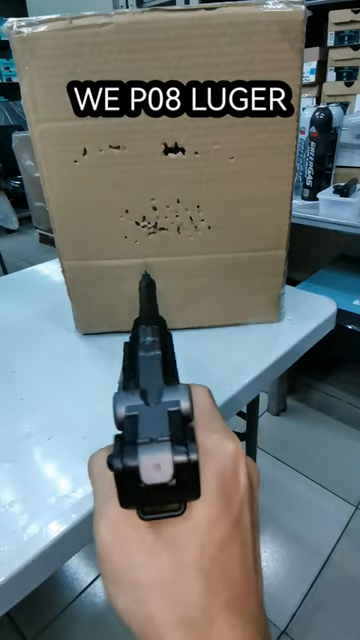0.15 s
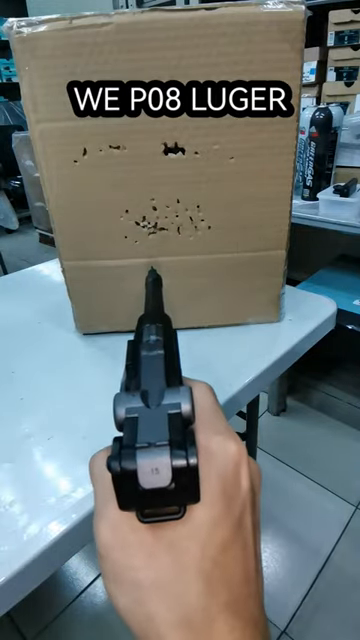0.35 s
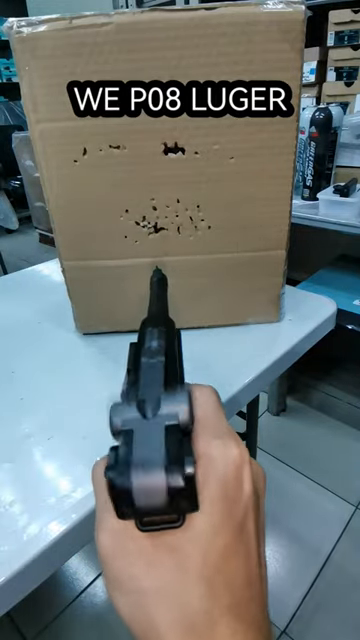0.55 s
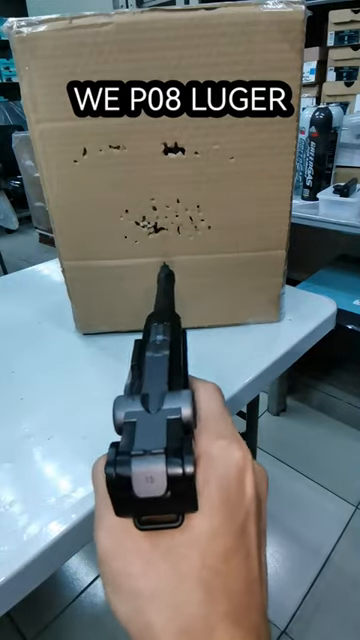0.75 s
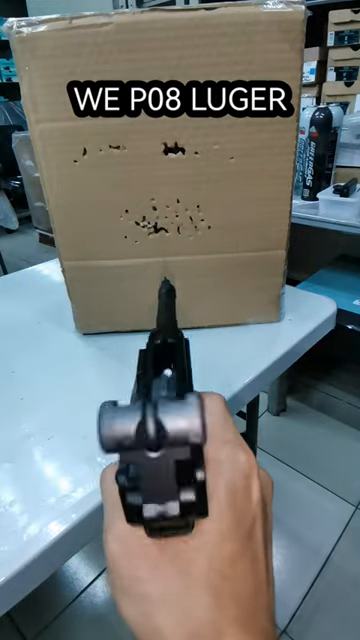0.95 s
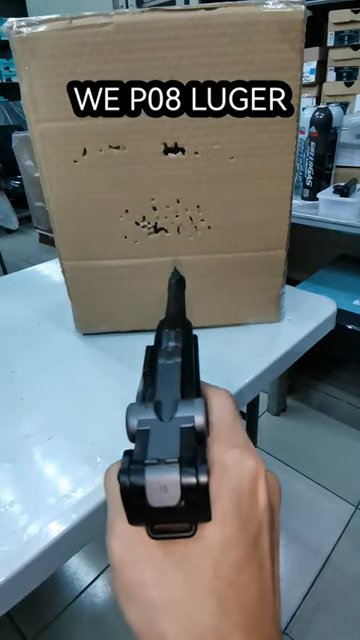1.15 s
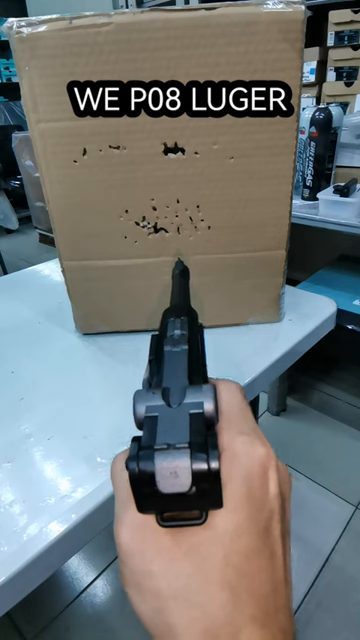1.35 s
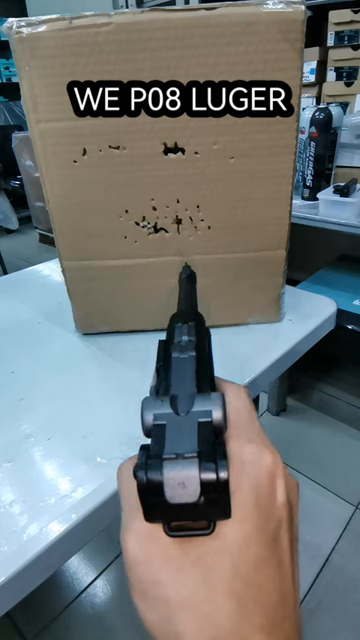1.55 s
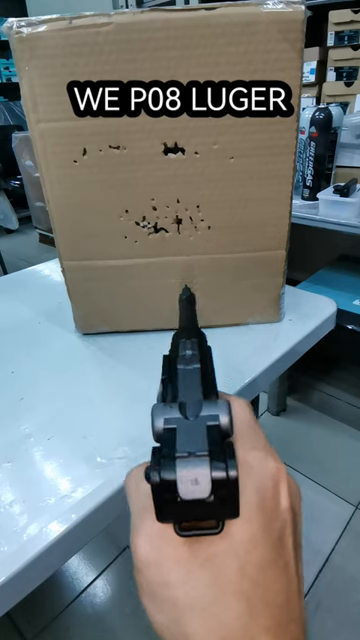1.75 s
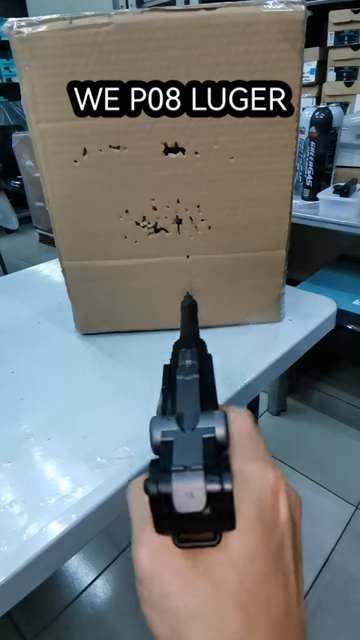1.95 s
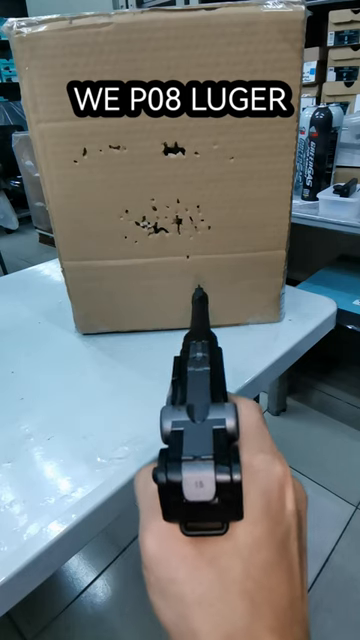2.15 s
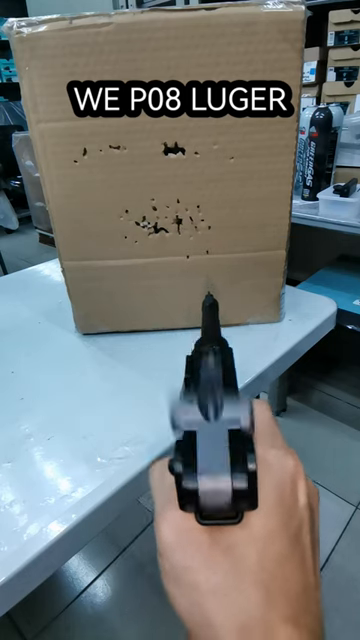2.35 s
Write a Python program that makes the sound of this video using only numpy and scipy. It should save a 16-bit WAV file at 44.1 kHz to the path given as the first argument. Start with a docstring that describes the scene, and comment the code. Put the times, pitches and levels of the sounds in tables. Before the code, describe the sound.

Five sharp gas airsoft pistol shots, close in stereo, at about 0.2, 0.65, 1.1, 1.5 and 2.0 seconds, the first loudest. Each has a dry crack and low gas puff, a hollow cardboard smack 20 milliseconds later, and a metallic clack as the action shuts. Tiny trigger ticks precede the last four; pellets bounce near 0.37, 0.8 and faintly 1.8. Short bright room tail, faint ventilation.

```python
"""Five sharp pistol shots smack a cardboard box close by, each with a short room ring, over faint ventilation.
A gas blowback airsoft pistol is fired in a small shop, just in front of the microphone pair.
Each shot is shaped noise for the crack and venting gas, with decaying tones for the steel and the box.
The toggle then hits its rear stop and snaps shut; three times a spent pellet bounces.
Light trigger ticks come before every shot but the first. Filtered noise makes the air and the room."""
import sys
import numpy as np
from scipy import signal
from scipy.fft import rfft, irfft
from scipy.io import wavfile

SR = 44100
rng = np.random.default_rng(int(sys.argv[2]) if len(sys.argv) > 2 else 0)


def wav_out(sig):
    """Save sig, one row per channel (or a flat mono array), as 16-bit PCM at SR to the path in sys.argv[1]."""
    wavfile.write(sys.argv[1], SR, np.round(np.clip(np.atleast_2d(sig).T, -1, 1) * 32767).astype(np.int16))


N = 103635  # length in samples

# hammer and gas burst of each shot: t/s, relative level/dB, bass/dB, middle/dB, steel band/dB, treble/dB,
# rise/s, decay/s, left over right/dB, pitch ratio
SHOT_EVENTS = [(.2030, 2.5, -3, -1.5, 0, -2, 0.0054, 0.0035, 0, .94),
               (0.6535, -4, 0.5, 0.5, -1.5, -1, 0.0038, 0.011, -2, 1.017),
               (1.082, -3, -2.5, 3, 1.5, 1.5, 0.0054, 0.0058, -1.5, 0.97),
               (1.5240, -0.25, -5.5, 0.5, 1, 0, 0.0041, 0.0066, -0.5, 0.98),
               (2.0202, -1, -3, 3, 2.5, 0, 0.0041, 0.0041, -1.5, 1.007)]
# spectrum of the toggle's metal blows: f/Hz, relative level per Hz/dB
METAL_SPECTRUM = [(25, 0.5), (70, -3.5), (250, -7.5), (500, -16), (900, -4), (1500, 0), (2300, -1.5),
                  (3200, 3), (4700, -2.5), (6000, -4), (7500, -2), (9500, -6), (13000, -8), (16000, -22.5)]


def amp(db):
    """Turns decibels into a gain."""
    return 10 ** (np.asarray(db) / 20)


def read(points, hz):
    """Reads a curve between its points, on a log-frequency axis."""
    f, value = np.transpose(points)
    return np.interp(np.log(hz + 1), np.log(f + 1), value)


def add(mix, s, sound):
    """Lays a sound into the mix at time s, cutting off what runs past the end."""
    part = mix[:, max(round(s * SR), 0):][:, :sound.shape[-1]]
    part += sound[..., :part.shape[1]]


def pair(z):
    """Blends two unrelated signals until they are as alike as the two microphones hear them."""
    # likeness of the microphones, limited to +-0.99 below: f/Hz, correlation
    likeness = [(60, -0.4), (160, 1.1), (300, 0.78), (700, 0.38), (1300, -0.1), (2200, -0.04),
                (4500, -0.14), (12000, 0)]
    a, b = rfft(z)
    same = np.clip(read(likeness, np.fft.rfftfreq(z.shape[1], 1 / SR)), -.99, .99)
    mid = a * np.sqrt((1 + same) / 2)
    side = b * np.sqrt((1 - same) / 2)
    return irfft(np.array([mid + side, mid - side]), z.shape[1])


def colour(x, points, tone=(0, 0, 0, 0), size=4096):
    """Filters with a spectrum scaled to unit power, then four broad tone controls; nothing sounds early."""
    # centres of the bass, middle, steel band and treble controls: f/Hz
    tone_centres = [200, 1500, 4800, 10000]
    hz = abs(np.fft.fftfreq(size, 1 / SR))
    gain = amp(read(points, hz))
    gain = gain / np.sqrt(np.mean(gain ** 2))
    gain = gain * amp(read(list(zip(tone_centres, tone)), hz))
    # minimum phase: the filter's energy comes as early as it can
    log_spectrum = np.conj(signal.hilbert(np.log(gain)))
    taps = np.fft.ifft(np.exp(log_spectrum)).real
    return signal.fftconvolve(x, taps[None, :size // 2], axes=1)[:, :x.shape[1]]


def clock(size=16384):
    """Time axis of one event, in seconds."""
    return np.arange(size) / SR


def swell(rise_s, decay_s):
    """Loudness shape of a blow: an accelerating rise, then an exponential fall."""
    t = clock()
    rise = np.minimum(t / rise_s, 1) ** 2
    fall = np.exp(-np.maximum(t - rise_s, 0) / decay_s)
    return rise * fall


def burst(envelope):
    """A dense rattle of tiny positive or negative pressure steps under an envelope."""
    return pair(rng.choice([-1., 1.], (2, len(envelope)))) * envelope


def ventilation():
    """Air noise and a faint wavering hum; both sink at each shot and creep back."""
    # spectrum of the air noise: f/Hz, relative level per Hz/dB
    air_spectrum = [(25, -14), (70, -7.5), (145, -12.5), (220, -7), (640, -9.5), (950, -9), (1400, -9),
                    (2600, -10.5), (4800, -17), (6500, -26), (12000, -41), (16000, -44)]
    # air noise over time: t/s, level/dB
    air_level = [(0, -53.5), (.19, -52.5), (.26, -74), (.48, -62.5), (.63, -57.5), (.75, -68.5),
                 (1.03, -59), (1.2, -63.5), (1.47, -59.5), (1.62, -67.5), (1.97, -57), (2.1, -61),
                 (2.35, -63.5)]
    # hum tones at their fullest: f/Hz, level/dB
    hum_tones = [(145.3, -71.5), (506, -76), (651, -75), (1394, -71.5)]
    hum_full_db = -57.5  # air level below which the hum sinks with it
    t = np.arange(N) / SR
    level_db = np.interp(t, *np.transpose(air_level))
    hum = 0
    for hz, db in hum_tones:
        waver = .02 * np.cumsum(rng.standard_normal(N))
        phase = 2 * np.pi * hz * t + waver + rng.random((2, 1))
        hum = hum + amp(db) * np.sqrt(2) * np.sin(phase)
    air = colour(pair(rng.standard_normal((2, N))), air_spectrum)
    return air * amp(level_db) + hum * amp(np.minimum(level_db - hum_full_db, 0))


def steel(rise_s):
    """The ring of the barrel and toggle: fading tones, whose balance differs at every blow."""
    # ringing tones of the steel parts: f/Hz, relative level/dB, time to fall 60 dB/s
    steel_modes = [(2153, 9, 0.15), (2860, -7, 0.082), (3434, -8.5, .2), (4322, 2, .15), (4400, -4, .2),
                   (4645, -3, .18), (4740, -8, 0.17), (5300, 3, 0.13), (4960, -30, .12), (5600, -8, .1),
                   (7000, -12, .12)]
    t = clock()
    ring = 0
    for hz, db, t60 in steel_modes:
        strength = rng.rayleigh(np.sqrt(.5))
        tone = np.sin(2 * np.pi * (hz * t + rng.random((2, 1))))
        ring = ring + strength * amp(db - 60 * t / t60) * tone
    return amp(-32) * np.minimum(t / rise_s, 1) ** 2 * ring


def shots():
    """The hammer knocks the valve open: a crack, then venting gas."""
    # spectrum of crack and gas at pitch ratio 1: f/Hz, relative level per Hz/dB
    shot_spectrum = [(25, -20), (60, -24), (140, -2), (260, 1.5), (400, -2.5), (620, 0), (820, 5.5),
                     (1000, 2), (1500, -1), (2400, 0), (3700, -1.5), (4400, 4.5), (5200, 9.5), (5900, -1.5),
                     (7500, -4), (10500, -8.5), (13500, -9.5), (16000, -24.5)]
    shot_db = -13  # added to every shot's own level
    vent_db, vent_s = -15, 0.032  # gas level relative to the crack, and its decay time
    out = np.zeros((2, N))
    for s, db, bass, middle, band, treble, rise_s, decay_s, pan_db, pitch in SHOT_EVENTS:
        envelope = swell(rise_s, decay_s) + amp(vent_db) * swell(rise_s, vent_s)
        spectrum = [(hz * pitch, level) for hz, level in shot_spectrum]
        crack = colour(burst(envelope), spectrum, (bass, middle, band, treble))
        crack = crack + amp(band) * steel(rise_s)
        left_right = amp([[pan_db / 2], [-pan_db / 2]])
        add(out, s, amp(shot_db + db) * left_right * crack)
    return out


def room(x):
    """Early echoes from the table and shelves, then the shop's tail, which fades at its own rate per pitch."""
    # how fast the tail fades: f/Hz, time to fall 60 dB/s
    fade_times = [(150, .5), (400, 0.34), (1000, 0.37), (2800, 0.4762), (5000, 0.53), (9000, 0.4677),
                  (15000, 0.43)]
    # spectrum of the tail, which also sets its strength: f/Hz, level/dB
    tail_spectrum = [(40, -28), (110, -34), (170, -24), (275, -17), (400, -20), (900, -16.5), (2500, -12),
                     (5000, -14.5), (8500, -13), (9500, -9.5), (10800, -11.5), (15000, -13.5)]
    # spectrum of the early echoes: f/Hz, relative level/dB
    early_spectrum = [(40, -45), (150, -16.5), (300, 0.5), (600, -7), (1500, 0), (5000, 0), (16000, 3)]
    onset_s, early_db, early_s = 0.029, -5, 0.016  # tail rise, early echo level and decay
    t = np.arange(SR) / SR
    # scattered echoes: about one sample in 25, none in the first 3 ms
    sparse = rng.choice([-1., 1.], (2, SR)) * (rng.random((2, SR)) < .04)
    early = pair(sparse) * np.exp(-t / early_s) * (t > .003)
    early_size = np.sqrt(np.sum(early ** 2) / 2)
    early = amp(early_db) * colour(early, early_spectrum) / early_size
    hz, times, z = signal.stft(pair(rng.standard_normal((2, SR))), SR, nperseg=256)
    fade = amp(-60 * times / read(fade_times, hz)[:, None])
    tail = signal.istft(z * fade, SR, nperseg=256)[1][:, :SR]
    tail = tail * np.minimum(t / onset_s, 1) ** 2
    tail_gain = np.sqrt(np.mean(amp(read(tail_spectrum, hz)) ** 2))
    tail = tail_gain * colour(tail / np.linalg.norm(tail[0]), tail_spectrum)
    return signal.fftconvolve(x, tail + early, axes=1)[:, :N]


def puffs():
    """Each shot blows one low push and pull of pressure across the microphones."""
    # gas puffs: t of the middle/s, peak level on the left/dB, f/Hz, right as a share of left (minus = flipped)
    puff_events = [(0.2135, -16.5, 140, -0.098), (0.661, -25, 170, -0.7), (1.088, -26, 200, -0.87),
                   (1.531, -18, 170, 0.24), (2.0250, -23, 240, -0.54)]
    out, t = np.zeros((2, N)), np.arange(N) / SR
    for s, db, hz, right in puff_events:
        u = 2 * np.pi * hz * (t - s)
        push_pull = -u * np.exp((1 - u ** 2) / 2)
        out += np.array([[1], [right]]) * amp(db) * push_pull
    return out


def box():
    """The pellet punches the cardboard: a snap and a hollow knock, its tones shifted slightly at random each time."""
    # pellet hits: t/s, relative level/dB, extra snap/dB
    hits = [(0.2222, 1, -0.5), (0.6713, 1.5, 1.5), (1.1010, 0.5, -6), (1.543, 1.5, 0), (2.0384, -1.5, -2.5)]
    # hollow tones of the cardboard, before the random shift: f/Hz, relative level/dB, time to fall 60 dB/s
    box_modes = [(190, -36, 0.011), (296, -24.5, 0.027), (430, -25, 0.0095), (547.5, -20, 0.023),
                 (636, -24, 0.011), (1150, -17.5, 0.012)]
    # spectrum of the snap: f/Hz, relative level per Hz/dB
    snap_spectrum = [(60, -29), (400, -4), (1300, -2.5), (3000, 0), (8000, -10), (16000, -26)]
    snap_db, snap_s = -16.5, 0.0013  # snap level before its extra, and decay time
    out, t = np.zeros((2, N)), clock()
    low_cut = signal.butter(1, 110, "high", fs=SR)
    for s, db, extra_db in hits:
        knock = 0
        for hz, level, t60 in box_modes:
            tone = np.sin(2 * np.pi * hz * rng.uniform(0.972, 1.058) * t)
            knock = knock - amp(level - 60 * t / t60) * tone
        snap = colour(burst(swell(0.00021, snap_s)), snap_spectrum)
        snap = amp(snap_db + extra_db) * snap
        add(out, s, amp(db) * (signal.lfilter(*low_cut, knock) + snap))
    return out


def toggle_stops():
    """The toggle strikes its rear stop: a thin, metallic burst of noise and a steel ring."""
    # rear stop blows: t/s, level/dB
    stops = [(0.2268, -24.5), (.6775, -22), (1.106, -21), (1.548, -23.5), (2.0445, -23)]
    rise_s, decay_s = 0.0028, 0.0067
    out = np.zeros((2, N))
    for s, db in stops:
        blow = colour(burst(swell(rise_s, decay_s)), METAL_SPECTRUM, (-9, -1.5, -2.0, -1.0))
        add(out, s, amp(db) * (blow + steel(rise_s)))
    return out


def toggle_closes():
    """The toggle slides forward with a swelling scrape, then snaps shut with a steel ring."""
    # snaps: t/s, level/dB, decay/s, thud in the bass/dB
    closes = [(0.2711, -19.5, 0.0024, -2.5), (0.7166, -24, 0.0057, 5), (1.1498, -22, 0.0042, 0),
              (1.5934, -23, 0.0034, -1), (2.0878, -23.5, 0.0044, 5)]
    rise_s = .0012
    slide_s, slide_db = .009, -10  # rise time of the slide, and its level relative to the snap
    out = np.zeros((2, N))
    for s, db, decay_s, thud_db in closes:
        slide = colour(burst(swell(slide_s, decay_s)), METAL_SPECTRUM)
        add(out, s - slide_s, amp(db + slide_db) * slide)
        snap = colour(burst(swell(rise_s, decay_s)), METAL_SPECTRUM, (thud_db, -1, 0, 0))
        add(out, s, amp(db) * (snap + steel(rise_s)))
    return out


def pellet_bounces():
    """Spent pellets bounce: very short, bright noise clicks."""
    # bounces: t/s, level/dB
    bounces = [(0.3724, -35), (0.8032, -32), (1.822, -55.5)]
    # spectrum of a bounce: f/Hz, relative level per Hz/dB
    bounce_spectrum = [(200, -27), (1800, -19), (3200, 9), (6000, -7), (10500, 2.5), (16000, -17.5)]
    out = np.zeros((2, N))
    for s, db in bounces:
        click = colour(burst(swell(0.00084, 0.00075)), bounce_spectrum)
        add(out, s, amp(db) * click)
    return out


def trigger_ticks():
    """The trigger linkage is taken up: light noise clicks, some brighter than others."""
    # ticks: t/s, level/dB, treble/dB (half as much in the steel band)
    ticks = [(0.614, -52.5, 12), (0.627, -50, 3), (1.0571, -40.5, 4.5), (1.067, -38.5, -6.5),
             (1.4955, -42.5, 4), (1.501, -39.5, -2), (1.516, -37, -15.5), (1.9938, -45.5, 10),
             (2.0017, -37.5, -6), (2.0116, -30, 2)]
    # spectrum of a tick before its treble setting: f/Hz, relative level per Hz/dB
    tick_spectrum = [(100, -8.5), (600, -10), (1050, 1.5), (1650, 8), (2400, -6), (3300, -2), (4500, -8),
                     (6000, -17), (12000, -21.5), (16000, -37)]
    out = np.zeros((2, N))
    for s, db, treble_db in ticks:
        click = colour(burst(swell(0.0011, .003)), tick_spectrum, (0, 0, treble_db / 2, treble_db))
        add(out, s, amp(db) * click)
    return out


def scene():
    """Pistol and box in the room; each shot's stretch gets its own random echoes."""
    dry = shots() + box() + toggle_stops() + toggle_closes() + pellet_bounces() + trigger_ticks()
    # number of the shot whose stretch each sample lies in
    turn = np.searchsorted([row[0] for row in SHOT_EVENTS[1:]], np.arange(N) / SR)
    echoes = sum(room(dry * (turn == k)) for k in range(len(SHOT_EVENTS)))
    return dry + echoes + puffs() + ventilation()


def record(dry):
    """The two microphones differ in colour; then everything above about 16 kHz is cut."""
    # left microphone over right: f/Hz, level difference/dB
    balance = [(40, 8), (110, -3.5), (260, -1), (500, 0.5), (800, -2.5), (1200, -0.5), (3000, 0),
               (4800, -3), (6500, 6), (8100, 3), (9500, 17), (11000, -1), (16000, 3)]
    lean_db = read(balance, np.fft.rfftfreq(2 * N, 1 / SR))
    heard = irfft(rfft(dry, 2 * N) * amp([lean_db / 2, -lean_db / 2]))[:, :N]
    high_cut = signal.firwin(255, 16000, window=("kaiser", 9), fs=SR)
    return signal.oaconvolve(heard, high_cut[None], "same")


dry = scene()
out = record(dry)
wav_out(out)
```